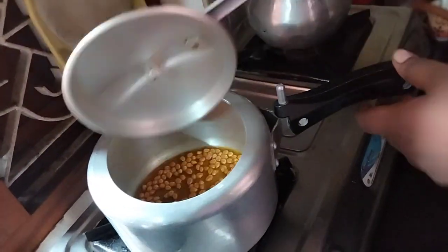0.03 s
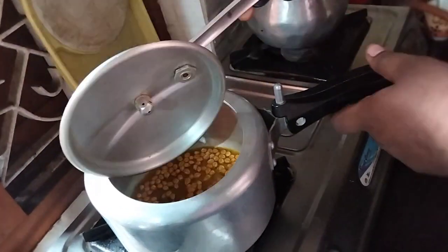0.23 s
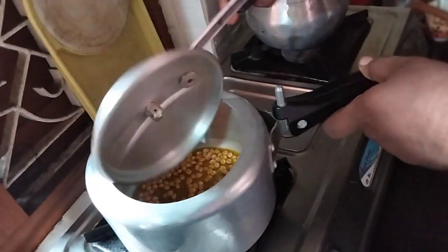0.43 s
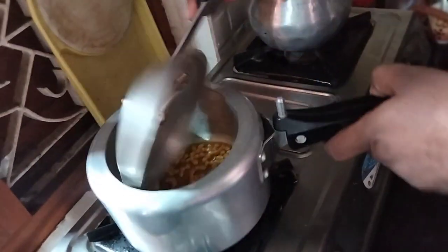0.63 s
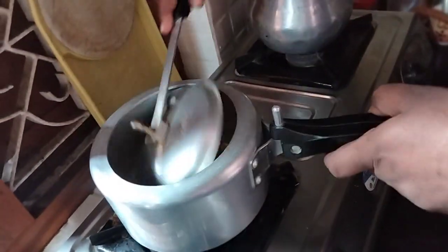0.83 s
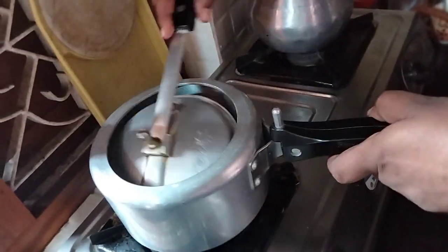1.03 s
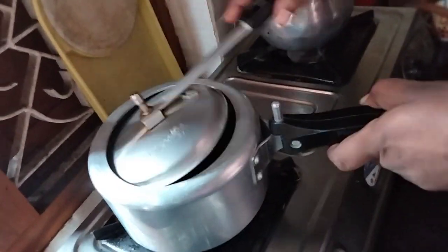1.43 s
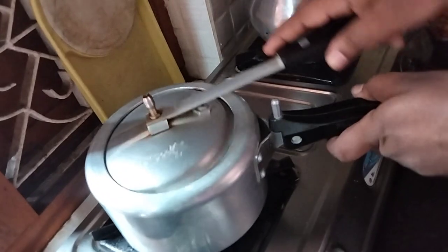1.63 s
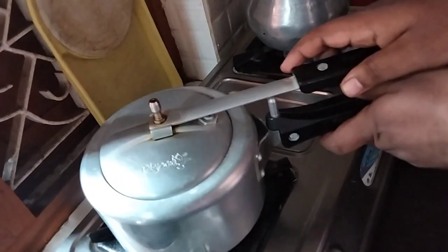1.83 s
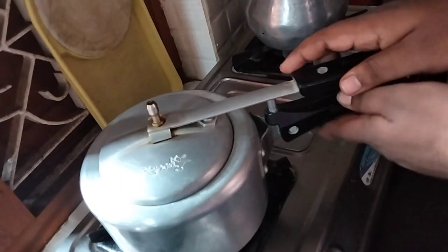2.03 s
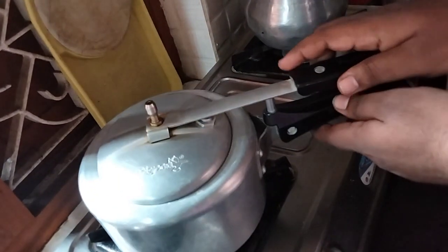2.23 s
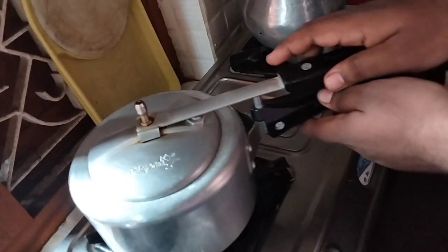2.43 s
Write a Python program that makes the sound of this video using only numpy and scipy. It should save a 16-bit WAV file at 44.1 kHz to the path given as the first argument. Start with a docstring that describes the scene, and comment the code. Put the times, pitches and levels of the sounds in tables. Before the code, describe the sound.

A metal lid clanks onto a pressure cooker, with first knocks around 0.2 to 0.5 seconds. From 0.7 to 1.6 seconds come quick ringing clinks and rim scraping, with brief squeaks near one second. Hollow booms from the pot sink in pitch as the lid closes, seating with a rattle at 1.8 seconds. After two seconds the handles meet in softer, dull clicks over a faint kitchen hum.

```python
"""Over the faint hum of a small kitchen, an aluminium lid knocks edge first on a pressure cooker.
Each impact excites the modes of lid and pot; sliding friction scrapes along the rim, and stick-slip
motion squeaks. The lid rings while it hangs free, then seats with a rattle. The hollow boom of the
enclosed air sinks in pitch as the gap closes, and at last the handles click together."""
import sys
import numpy as np
from scipy import signal
from scipy.fft import rfft, irfft
from scipy.io import wavfile

SR = 44100
rng = np.random.default_rng(int(sys.argv[2]) if len(sys.argv) > 2 else 0)


def store_wav(level_fs):
    """Save 16-bit WAV to argv[1]."""
    pcm = np.round(np.clip(np.atleast_2d(level_fs), -1, 1) * 32767)
    wavfile.write(sys.argv[1], SR, pcm.T.astype(np.int16))


N = 110250
TIME = np.arange(N) / SR

# Spectra of room noise, rubbing and microphone. Each row: frequency in Hz, gain in dB.
ROOM_SPECTRUM = [(25, -35), (50, -12.5), (90, -4), (180, -12.5), (290, -5.5), (400, -19.5), (1000, -32),
                 (3500, -30.5)]
RUB_SPECTRUM = [(60, -21), (170, -1), (450, 0), (1100, -0.5), (1900, -2.5), (3900, -8), (5000, -12.5),
                (7500, -13.5)]
MIC_RESPONSE = [(40, -18.5), (110, -7.5), (200, -4), (450, -2.5), (630, -3.5), (1200, 3), (1800, -3.5),
                (2400, 1), (2950, -5.5), (3900, 3), (5000, -1.5), (6300, 0.5), (7500, 2), (8100, -10)]
# Impacts of lid on pot. Each row: start in seconds, levels in dB of bass, low mid, high mid,
# treble, lid ring and pot ring, favoured pitch in Hz.
IMPACTS = [ (0.2339, -22.5, -34.5, -33.5, -28.5, -38, -26.5, 317),
           (0.3784, -54, -45, -24, -23, -49, -34, 2440), (0.418, -24, -44, -24.5, -28.5, -49, -45, 2900),
           (0.4575, -17.5, -17, -19.5, -19, -40.5, -28, 610),
           (.659, -29.5, -23.5, -25, -30.5, -47.5, -24, 404),
           (0.696, -32, -27.5, -22.5, -26, -28.5, -25, 2460),
           (0.721, -42.5, -26, -24.5, -22, -37.5, -48, 3700),
           (.741, -26, -19.5, -21.5, -31, -28, -42, 1300), (.785, -18, -23.5, -21.5, -27.5, -33, -25, 557),
           (.818, -34, -25.5, -28, -34.5, -35, -29, 1025), (.962, -27, -24, -23, -20, -18, -33.5, 4150),
           (1.037, -59, -56.5, -23.5, -22.5, -19, -44, 1953),
           (1.049, -55.5, -57.5, -22, -23.5, -22, -52, 3174),
           (1.101, -32.5, -20.5, -16, -19.5, -29.5, -43, 1430),
           (1.119, -42.5, -23.5, -25.5, -39, -34, -45, 2200),
           (1.217, -28, -20, -15, -21, -21.5, -25.5, 3150),
           (1.2743, -32.5, -19.5, -22.5, -19, -35.5, -35.5, 950),
           (1.286, -32.5, -21.5, -35.5, -22, -31, -24, 810), (1.455, -33, -23, -31, -24, -25.5, -23.5, 493),
           (1.475, -54, -34.5, -22.5, -23, -29.5, -36, 3590),
           (1.5273, -22, -21.5, -16.5, -18, -28.5, -21.5, 2640),
           (1.558, -33.5, -29.5, -21.5, -24, -35, -35.5, 2640),
           (1.801, -28.5, -27, -24, -30.5, -21, -33, 1870),
           (1.810, -46.5, -26.5, -24.5, -33.5, -29, -37, 1247),
           (1.821, -40, -35, -29, -27.5, -35, -46, 5810), (1.841, -32.5, -30.5, -24.5, -23, -23, -57, 6860)]
# Dense wall modes in those four bands. Each row: centre in Hz, clack decay in seconds,
# relative tail level in dB, tail decay in seconds. Decay times are for a fall of 60 dB.
WALL_BANDS = [(250, 0.094, -9, 0.664), (1110, 0.051, -5, 0.14), (2870, 0.054, -17.5, 0.37),
              (6100, 0.035, -9.5, 0.12)]
# Normal modes. Each row: frequency in Hz, relative level in dB, decay time in seconds.
FREE_LID_MODES = [(1010, -7.5, 0.35), (1265.6, 4, 0.28), (1465, -18.5, 0.63), (2010, -10.5, 0.25),
                  (3167.2, 3.5, 0.17), (4050, -11, 0.14), (5800, -2, 0.18)]
SEATED_LID_MODES = [(1248.6, 2, 0.19), (1352, 2, 0.18), (2620, -6, 0.25), (3614, -1, 0.16),
                    (3994, -5, 0.24), (4370, -13, 0.34), (5810, -3.5, 0.169), (7070, -17, .28)]
POT_MODES = [(310.6, -1.5, 0.53), (391.7, -1.5, 0.29), (419, -8.5, 0.18), (493.7, 5.5, 0.24),
             (534.3, 3.5, 0.34), (676.3, -5, 0.13), (848, 0.5, 0.22), (1014, -11.5, 0.32), (1761, -2, 0.11),
             (2390, -3.5, 0.11), (2640, -1, 0.14), (3430, -13.5, 0.63)]
# Friction force on the rim, and the treble gain of its sound. Each row: time in seconds, gain in dB.
RUB_FORCE = [(.2, -63.5), (.32, -44.5), (.39, -59), (.43, -43), (.5, -38.5), (.62, -40.5), (.66, -27),
             (.69, -32), (.77, -25), (.85, -31.5), (.95, -33.5), (1.02, -39.5), (1.06, -34), (1.14, -34.5),
             (1.195, -44), (1.214, -33), (1.26, -37.5), (1.35, -27), (1.44, -42.5), (1.485, -23.5),
             (1.524, -38), (1.56, -33.5), (1.61, -36), (1.66, -30.5), (1.79, -36.5), (1.96, -41),
             (2.03, -42), (2.14, -37), (2.23, -47.5), (2.4, -50), (2.46, -42.5)]
RUB_BRIGHTNESS = [(.5, -3), (.85, 1.5), (.96, -5), (1.06, 8.5), (1.17, 5.5), (1.36, 1.5), (1.48, 4.5),
                  (1.72, -2), (1.86, 11.5), (2.2, -9.5)]
# Squeaks. Each row: start and length in seconds, first and last pitch in Hz, level in dB,
# roughness from 0 to 1.
STICK_SLIPS = [(0.655, 0.026, 2385, 2370, -27, 0), (0.691, 0.025, 2334, 2360, -29, .3),
               (0.76, 0.08, 997, 1022, -28, 0.54), (.785, .05, 563.5, 539, -25.5, 0.3),
               (0.779, 0.0238, 5770, 5680, -24, 0.6), (0.869, 0.024, 5480, 5580, -21, 0.2),
               (0.891, 0.062, 5530, 5678, -24.5, 0.48), (0.904, 0.028, 5580, 5644, -15, 0),
               (1.032, 0.042, 1938, 1974, -21, 0.36), (1.045, 0.14, 3185, 3224, -27, 0.3),
               (1.039, 0.055, 4124, 3965, -30.5, 0.7)]
# Booms of the air in the pot. Each row: start in seconds, pitch in Hz, level in dB, decay in seconds.
CAVITY_BOOMS = [(1.213, 411, -20, 0.16), (1.272, 420.6, -23, 0.52), (1.33, 429.3, -23, 0.29),
                (1.451, 408.5, -9.5, 0.1), (1.494, 397.7, -10.5, 0.13), (1.526, 302, -18, .13),
                (1.54, 388.3, -21.5, .45), (1.672, 322, -20.5, 0.15), (1.755, 292.3, -26, 0.6),
                (1.87, 212.6, -34.5, 0.61), (1.949, 189.8, -32.5, 0.51), (2.055, 204, -28.5, 0.24),
                (2.199, 180, -30, .2), (2.256, 155.3, -31.5, 0.36)]
# Clicks of the handles and their catch. Each row: start in seconds, levels in dB of bass, low mid,
# high mid and treble.
HANDLE_IMPACTS = [(2.061, -33.5, -39.5, -24, -30.5), (2.099, -56, -52, -34, -49),
                  (2.156, -35, -32.5, -25, -36), (2.26, -38.5, -43.5, -38.5, -45),
                  (2.303, -43, -44, -36.5, -41), (2.362, -42, -48, -44.5, -45),
                  (2.425, -38.5, -62, -36, -73.5)]

AMBIENT_DB, HUM_DB, HUM_HZ = -42.5, -48.5, 101.6
ECHO_DB, ROOM_T60_S = -9, 0.26
CONTACT_S, SEATED_AT_S, BAND_LIMIT_HZ = 0.0015, 1.79, 8250
FOCUS_DB, FOCUS_OCTAVES = 6.5, 0.14
WALL_RIPPLE_DB, WALL_RIPPLE_HZ = 3.5, 59.5
RATTLE_DB, RATTLE_STEP_S = 2.5, 0.008
RING_FOLLOW = 0.14  # share of a blow's spectral tilt that the modes take over
GRAINS_PER_S, GRAIN_SPREAD_DB, RUB_POT_DB, RUB_LID_DB = 1500, 0.5, -6, -13
SLIPS_PER_S, SLIP_RING_S, SQUEAK_JITTER_HZ = 180, 0.0018, 15
BOOM_RISE_S, BOOM_WAVER_HZ = 0.005, 14


def amp(db):
    """Decibels to amplitude ratio."""
    return 10 ** (np.asarray(db) / 20)


def unit(x):
    """Normalisation to rms 1."""
    return x / np.sqrt(np.mean(x ** 2) + 1e-20)


def add(mix, start_s, sound):
    """Superposition: a sound joins the mix at its start time."""
    part = mix[max(round(start_s * SR), 0):][:len(sound)]
    part += sound[:len(part)]


def colour(x, points):
    """Linear filtering by a curve of (Hz, dB) points."""
    point_hz, db = np.transpose(points)
    hz = np.fft.rfftfreq(2 * len(x), 1 / SR)
    gain = amp(np.interp(np.log(hz + 1), np.log(point_hz), db))
    return irfft(rfft(x, 2 * len(x)) * gain)[:len(x)]


def wander(size, step):
    """Random fluctuation of rms 1, interpolated between values step samples apart."""
    return unit(np.interp(np.arange(size) / step, np.arange(4096), rng.standard_normal(4096)))


def kitchen(x):
    """Reverberation: close tiled walls reflect the sound, over steady room noise and mains hum."""
    t = TIME[:SR // 2]
    reflections = rng.standard_normal(len(t)) * (rng.random(len(t)) < .05) * (t > .003)
    reflections *= amp(-60 * t / ROOM_T60_S)
    echo = signal.fftconvolve(x, reflections / np.linalg.norm(reflections))[:N]
    air = unit(colour(rng.standard_normal(N), ROOM_SPECTRUM))
    hum = np.sqrt(2) * np.sin(2 * np.pi * HUM_HZ * TIME)
    return x + amp(ECHO_DB) * echo + amp(AMBIENT_DB) * air + amp(HUM_DB) * hum


def focus(hz, focus_hz):
    """Selective excitation: the point of contact favours modes near one pitch, by a gain in dB."""
    return FOCUS_DB * np.exp(-(np.log2((hz + 1) / focus_hz) / FOCUS_OCTAVES) ** 2)


def ring(modes, bands_db=None, focus_hz=None):
    """Free vibration: damped modes flutter as the lid rattles; a bright blow favours the high ones."""
    t = TIME[:SR // 2]
    hz, db, t60 = np.transpose(modes)[:, :, None]
    norm = np.sqrt((amp(db) ** 2).sum() / 2)
    if bands_db:
        log_centres = np.log([row[0] for row in WALL_BANDS])
        tilt_db = np.interp(np.log(hz), log_centres, bands_db) - max(bands_db)
        db = db + focus(hz, focus_hz) + RING_FOLLOW * tilt_db
    phase = 2 * np.pi * rng.random((len(hz), 1))
    rattle_db = RATTLE_DB * np.array([wander(len(t), RATTLE_STEP_S * SR) for _ in modes])
    partials = amp(db - 60 * t / t60 + rattle_db) * np.sin(2 * np.pi * hz * t + phase)
    return partials.sum(0) / norm * (1 - np.exp(-t / CONTACT_S))


def clack(bands_db, rise_s, hold_s, focus_hz):
    """Modal overlap: dense wall modes merge into noise, held while the contact chatters, then damped."""
    t = TIME[:SR // 2]
    since_hold = np.maximum(t - hold_s, 0)
    hz = np.fft.rfftfreq(len(t), 1 / SR)
    log_centres = np.log([row[0] for row in WALL_BANDS])
    passband = (hz < BAND_LIMIT_HZ) * (hz / np.hypot(hz, 160)) ** 3
    spectrum = rfft(rng.standard_normal(len(t))) * passband
    spectrum *= amp(focus(hz, focus_hz) + WALL_RIPPLE_DB * wander(len(hz), WALL_RIPPLE_HZ / hz[1]))
    out = 0
    for share, db, (_, t60, tail_db, tail_t60) in zip(np.eye(len(WALL_BANDS)), bands_db, WALL_BANDS):
        band = unit(irfft(spectrum * np.interp(np.log(hz + 1), log_centres, share), len(t)))
        front = 1.162 * amp(-60 * since_hold / t60)
        tail = amp(tail_db - 60 * t / tail_t60)
        out += band * amp(db) * np.hypot(front, tail)
    return out * (1 - np.exp(-t / rise_s))


def knocks():
    """Impact excitation: lid and pot clack and ring; the seated lid has other modes and chatters longer."""
    out = np.zeros(N)
    for start_s, *bands_db, lid_db, pot_db, focus_hz in IMPACTS:
        lid_modes, hold_s = (FREE_LID_MODES, .001) if start_s < SEATED_AT_S else (SEATED_LID_MODES, .011)
        lid = amp(lid_db) * ring(lid_modes, bands_db, focus_hz)
        pot = amp(pot_db) * ring(POT_MODES, bands_db, focus_hz)
        add(out, start_s, clack(bands_db, CONTACT_S, hold_s, focus_hz) + lid + pot)
    return out


def scrape():
    """Forced vibration: tiny frictional slips drive the walls and the modes of lid and pot."""
    slips = (rng.random(N) < GRAINS_PER_S / SR) * rng.choice([-1, 1], N)
    sizes = amp(GRAIN_SPREAD_DB * np.minimum(rng.exponential(1, N), 4))
    force = unit(slips * sizes) + 0.5 * rng.standard_normal(N)
    force *= amp(np.interp(TIME, *np.transpose(RUB_FORCE)))
    lowpass = signal.butter(8, BAND_LIMIT_HZ, fs=SR, output="sos")
    walls = unit(signal.sosfilt(lowpass, colour(force, RUB_SPECTRUM))) * force.std()
    treble = colour(walls, [(1000, -30), (2500, 0)])
    out = walls + treble * (amp(np.interp(TIME, *np.transpose(RUB_BRIGHTNESS))) - 1)
    free = TIME < SEATED_AT_S
    for modes, driven, db in [(POT_MODES, 1, RUB_POT_DB), (FREE_LID_MODES, free, RUB_LID_DB),
                              (SEATED_LID_MODES, ~free, RUB_LID_DB)]:
        response = ring(modes)
        out += amp(db) * signal.fftconvolve(force * driven, response / np.linalg.norm(response))[:N]
    return out


def squeaks():
    """Stick-slip oscillation: the sliding edge locks onto one mode, and uneven slips roughen the tone."""
    out = np.zeros(N)
    for start_s, length_s, first_hz, last_hz, db, roughness in STICK_SLIPS:
        size = round(length_s * SR)
        progress = np.linspace(0, 1, size)
        hz = first_hz + (last_hz - first_hz) * progress + SQUEAK_JITTER_HZ * wander(size, .002 * SR)
        kicks = (rng.random(size) < SLIPS_PER_S / SR) * np.exp(2j * np.pi * rng.random(size))
        slips = signal.lfilter([1], [1, -np.exp(-1 / (SLIP_RING_S * SR))], kicks)
        modulation = 1 - roughness + 2 * roughness * slips
        tone = (modulation * np.exp(2j * np.pi * np.cumsum(hz) / SR)).real
        add(out, start_s, amp(db) * unit(tone) * abs(np.sin(np.pi * progress)) ** 0.51)
    return out


def booms():
    """Cavity resonance: each push makes the air in the pot boom unevenly, lower as the gap narrows."""
    out, t = np.zeros(N), TIME[:SR // 2]
    attack = (1 - np.exp(-t / BOOM_RISE_S)) ** 2
    for start_s, hz, db, t60 in CAVITY_BOOMS:
        waver_hz = BOOM_WAVER_HZ * wander(len(t), RATTLE_STEP_S * SR)
        cycles = np.cumsum(hz + waver_hz) / SR + rng.random()
        decay = amp(db - 60 * t / t60 + RATTLE_DB * wander(len(t), RATTLE_STEP_S * SR))
        add(out, start_s, np.sqrt(2) * attack * decay * np.sin(2 * np.pi * cycles))
    return out


def handles():
    """Damped impact: the handles meet in dull, slightly smeared clicks without a ringing tone."""
    out = np.zeros(N)
    for start_s, *bands_db in HANDLE_IMPACTS:
        add(out, start_s, clack(bands_db, rise_s=.0064, hold_s=.009, focus_hz=1630))
    return out


def scene():
    """Superposition: all sounds of lid and pot add in the kitchen."""
    return kitchen(knocks() + handles() + scrape() + squeaks() + booms())[None]


def record(dry):
    """Frequency response: the microphone colours the sound, and a low-pass filter limits its band."""
    lowpass = signal.firwin(255, BAND_LIMIT_HZ, window=("kaiser", 8), fs=SR)
    return signal.oaconvolve(colour(dry[0], MIC_RESPONSE), lowpass, "same")[None]


dry = scene()
out = record(dry)
store_wav(out)
```